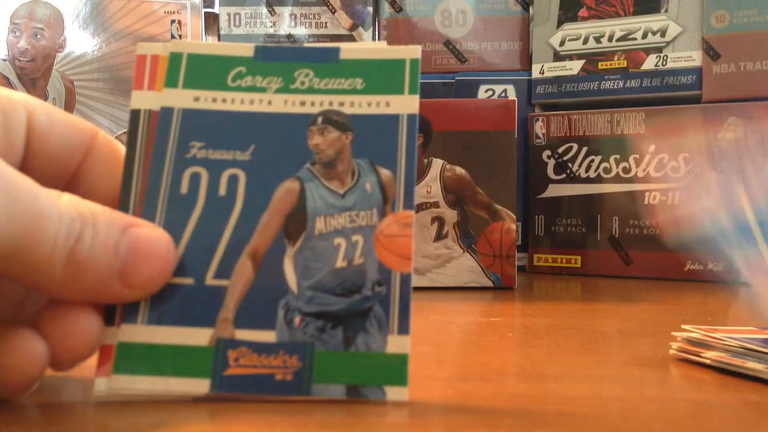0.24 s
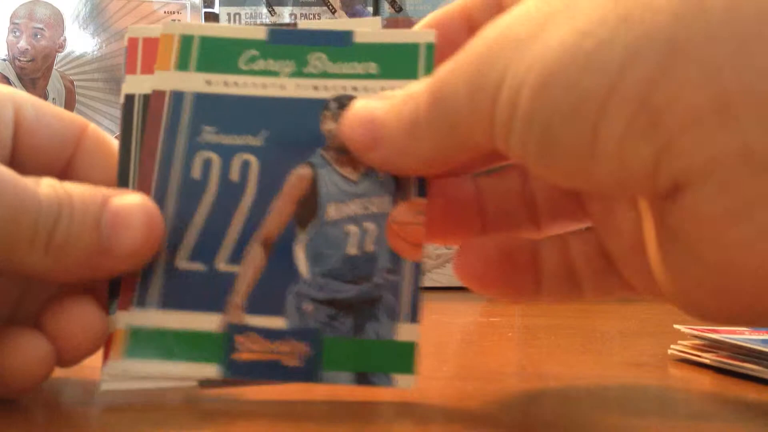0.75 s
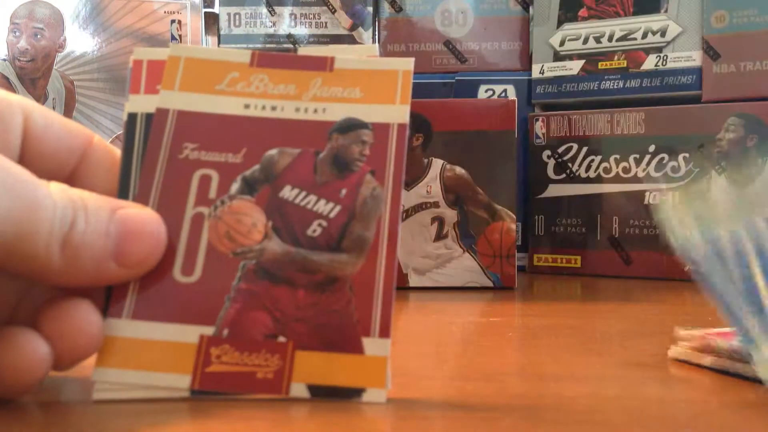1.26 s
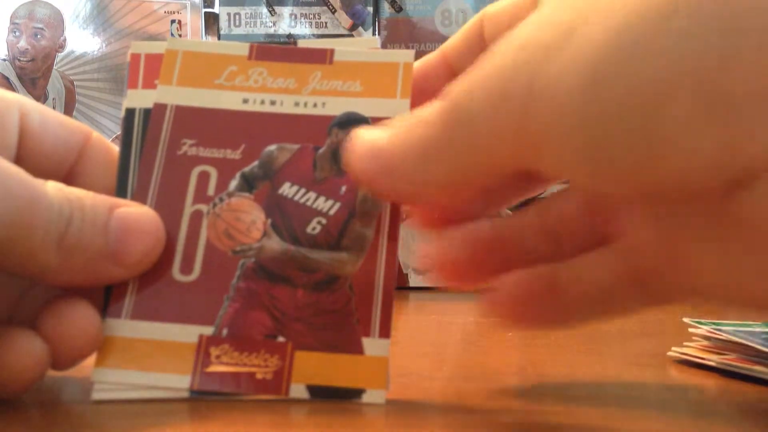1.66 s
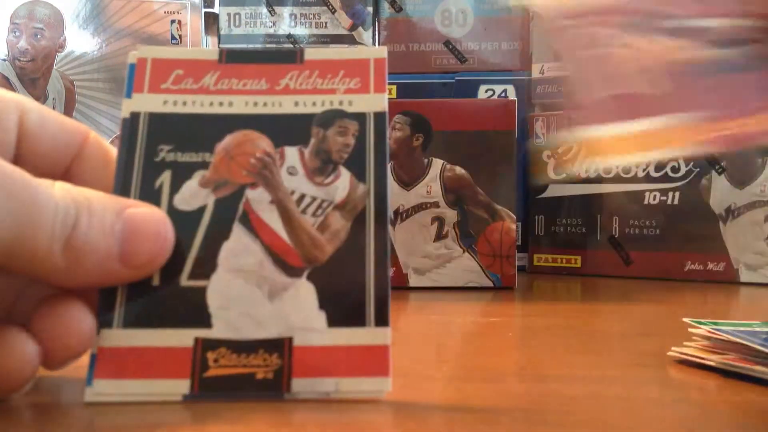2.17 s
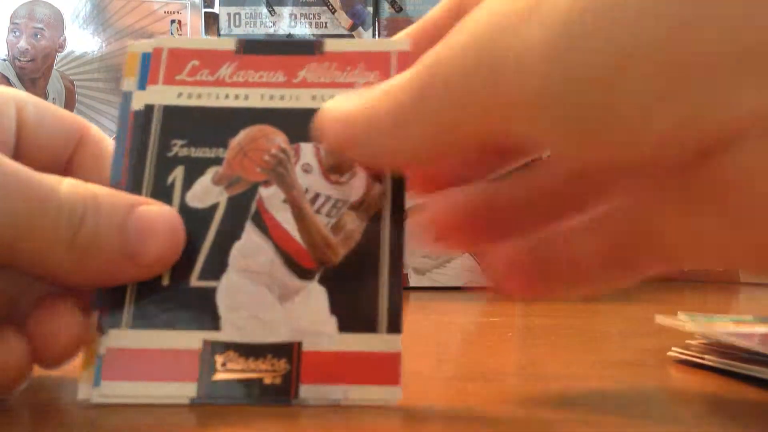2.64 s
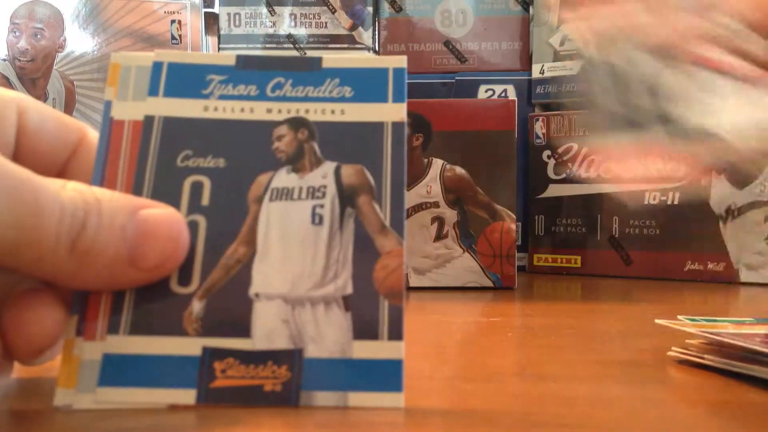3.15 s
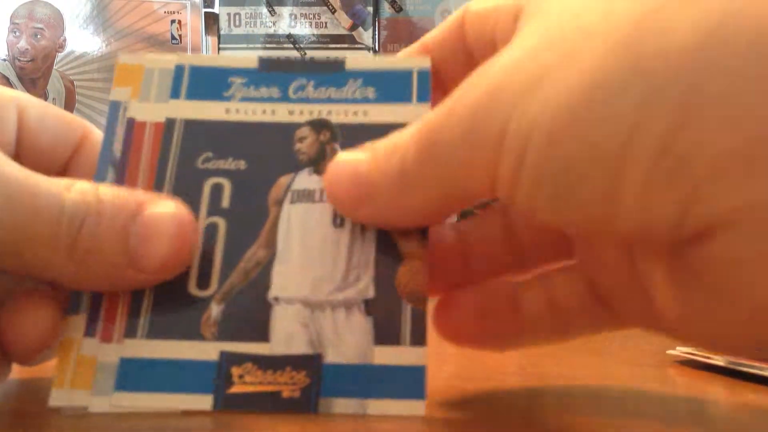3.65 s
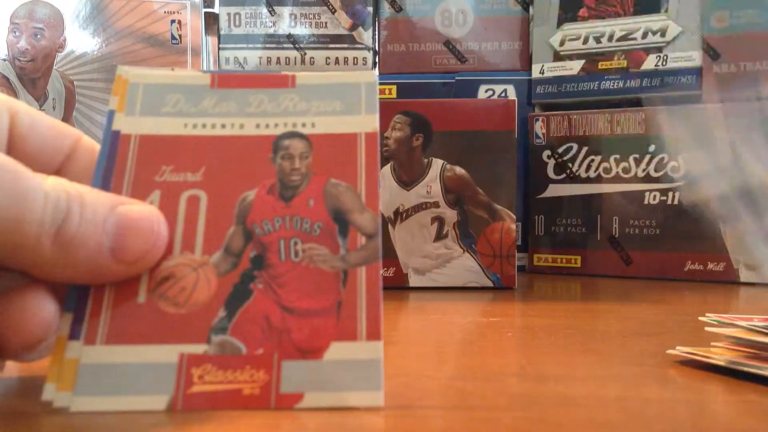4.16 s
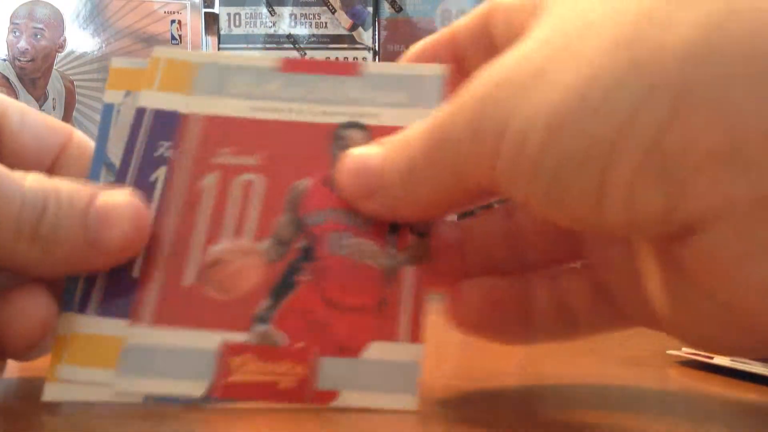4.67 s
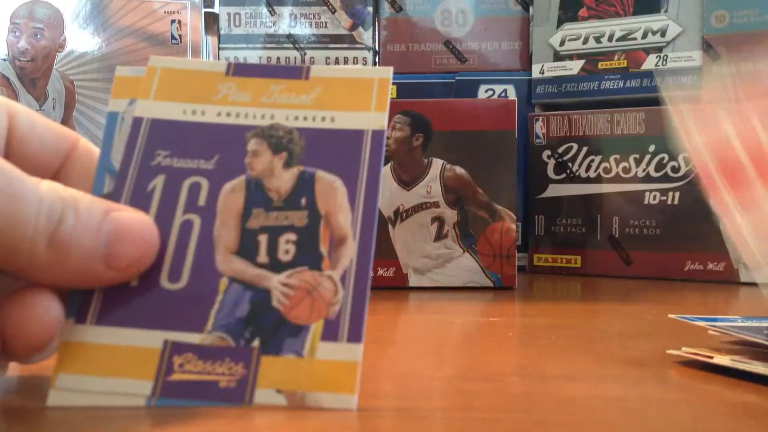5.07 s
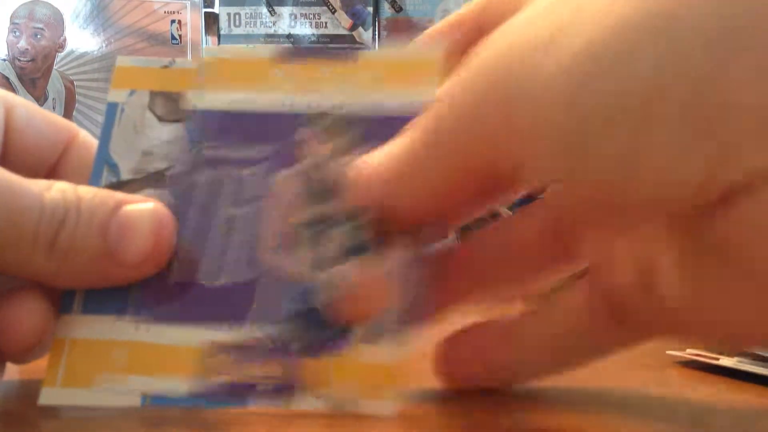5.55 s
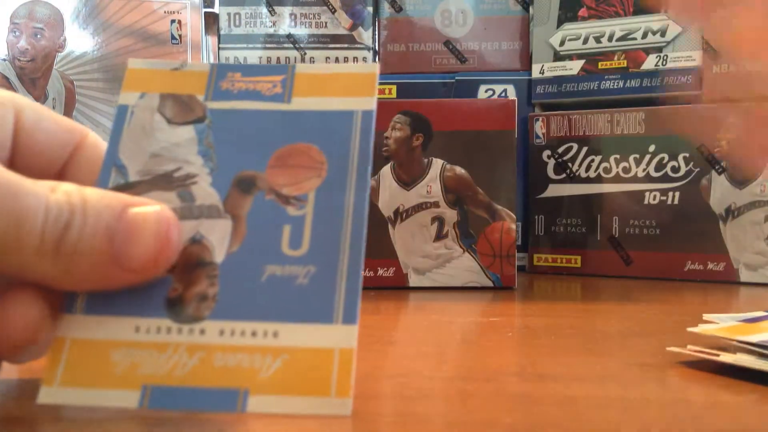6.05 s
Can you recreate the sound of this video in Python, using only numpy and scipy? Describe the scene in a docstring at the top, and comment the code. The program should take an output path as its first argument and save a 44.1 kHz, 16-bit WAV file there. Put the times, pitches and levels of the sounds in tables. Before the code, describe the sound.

In a quiet room, cards slide off a hand-held stack one by one, each snapping and slapping down with a dull desk bump.

```python
"""Soft swishes, snaps and slaps: trading cards are dealt onto a pile on a wooden desk, about one a second.
The thumb grips the top card of a hand-held stack, lets it creep, then pulls it free.
At the pile its edge taps down, it snaps off a fingertip, skids and slaps flat,
and the hand bumps the desk. A small quiet room answers."""
import sys
import numpy as np
from scipy import signal
from scipy.fft import rfft, irfft
from scipy.io import wavfile
from scipy.ndimage import uniform_filter1d

SR = 44100
rng = np.random.default_rng(int(sys.argv[2]) if len(sys.argv) > 2 else 0)


def bounce(signal):
    """Save signal as a 16-bit WAV file at the path given by the first command-line argument."""
    frames = np.transpose(np.atleast_2d(signal))
    limited = np.clip(frames, -1, 1)
    pcm = np.round(limited * 32767).astype(np.int16)
    wavfile.write(sys.argv[1], SR, pcm)


N = 278295
BLOW_SIZE = 8192  # samples in one short sound
AGE = np.arange(BLOW_SIZE) / SR

# the thumb draws a card off the stack: grip t/s, card free t/s, bump level/dB, creep/dB, pull/dB
CARD_DRAWS = [(0.722, 1.118, -61, -75, -55.5), (1.817, 2.156, -55.5, -76.5, -61),
              (2.785, 3.128, -42.5, -62.5, -51), (3.718, 4.036, -44.5, -62.5, -50),
              (4.636, 4.978, -49, -64.5, -49.5), (5.62, 5.707, -39.5, -55, -49.5)]
# the bent card springs off a fingertip: t/s, level/dB, brightness/(dB per octave), knock f/Hz
FINGER_SNAPS = [(1.3546, -23.5, -1.5, 3750), (2.393, -43, -3.5, 774), (3.3359, -19, -1.5, 2480),
                (4.2834, -25.5, -2, 2410), (5.221, -21, -2, 2460), (5.972, -39, -2.5, 2460)]


def undb(db):
    """Turn decibels into a factor to multiply by."""
    return 10 ** (np.asarray(db) / 20)


def unit(x):
    """Scale a sound to an average strength (rms) of 1."""
    return x / np.sqrt(np.mean(x ** 2))


def blow_level(x, db):
    """Scale a blow so that its energy, spread over 10 ms, has this level."""
    return x * undb(db) / np.sqrt(np.sum(x ** 2) / (.01 * SR))


def add(track, s, x):
    """Mix x into the track from time s."""
    start = int(s * SR)
    track[start:start + len(x)] += x[:N - start]


def read(points, hz):
    """Read between (f/Hz, value) points, with octaves evenly spaced."""
    at, value = np.transpose(points)
    return np.interp(np.log(hz + 1), np.log(at), value)


def colour(x, points, tilt_db=0):
    """Shape the tone by (f/Hz, gain/dB) points, made brighter by tilt_db per octave."""
    hz = np.fft.rfftfreq(BLOW_SIZE, 1 / SR)
    octaves = np.log2(np.maximum(hz, 250) / 2000)
    gain = undb(read(points, hz) + tilt_db * octaves)
    # build a filter that rings only after a hit, never before it
    cepstrum = irfft(np.log(gain))
    first_half = np.arange(BLOW_SIZE) < BLOW_SIZE // 2
    response = irfft(np.exp(rfft(2 * cepstrum * first_half) - cepstrum[0]))
    return signal.fftconvolve(x, response)[:len(x)]


def resonance(x, hz, width, db):
    """Lift one band, width Hz wide, or hollow it out if db is negative."""
    b, a = signal.iirpeak(hz, hz / width, fs=SR)
    return x + (undb(db) - 1) * signal.lfilter(b, a, x)


def drift(rate):
    """Wander smoothly through about `rate` random values a second."""
    hold = int(SR / rate)
    steps = np.repeat(rng.standard_normal(N // hold + 1), hold)
    return unit(uniform_filter1d(steps, hold)[:N])


def quiet_room(level_db=-63, waver_db=2.1, rumble_hz=700):
    """A low room rumble wavers under a faint even hiss."""
    # tone of the quiet room: f/Hz, gain/dB
    tone = [(15, -38.5), (25, -11), (75, -10), (154, -12), (172, -9.5), (224, -7), (404, -13), (501, -16),
            (749, -24), (1280, -23.5), (1500, -26), (2560, -29), (2780, -26.5), (3830, -27.5), (15000, -31)]
    noise = unit(colour(rng.standard_normal(N), tone))
    rumble = signal.sosfiltfilt(signal.butter(2, rumble_hz, fs=SR, output="sos"), noise)
    hiss = noise - rumble
    return undb(level_db) * (hiss + rumble * undb(waver_db * drift(9.6)))


def card_ring(x, stretch=1):
    """A touch is heard directly and through the card's bending notes; the grip stretches their pitch."""
    # notes of a held card: f/Hz, time to fade by 60 dB/s, level over the plain touch/dB
    notes = [(395.8, 0.046, 0), (841, 0.045, -6.5), (1460, 0.055, 0), (1692, 0.013, -7.5),
             (2074, 0.014, -5), (2510, 0.024, -3.5), (3190, 0.029, -5.5), (3600, 0.032, -20)]
    out = x
    for hz, t60, db in notes:
        width = np.log(1000) / (np.pi * t60)
        b, a = signal.iirpeak(hz * stretch, hz / width, fs=SR)
        out = out + undb(db) * signal.lfilter(b, a, x)
    return out


def blows(table, tone, chatter_db, chatter_s, chatter_hz, knock_db, knock_q, brush_db, brush_s):
    """The card brushes in, lands with a click and chatters; where it is hit favours one knock note."""
    out = np.zeros(N)
    landing = BLOW_SIZE // 4
    since = AGE - AGE[landing]
    brushing = undb(brush_db) * np.exp(-np.abs(since) / brush_s)
    settling = np.exp(-np.abs(since) / chatter_s)
    pressure = np.where(since < 0, brushing, settling)
    for s, db, tilt_db, knock_hz in table:
        chatter = rng.standard_normal(BLOW_SIZE) * pressure
        push = undb(chatter_db) * chatter / np.linalg.norm(chatter)
        push = signal.sosfilt(signal.butter(1, chatter_hz, "high", fs=SR, output="sos"), push)
        push[landing] -= 1  # the sharp click
        grip_stretch = 1 + 0.01 * np.tanh(rng.standard_normal())
        sound = card_ring(colour(push, tone, tilt_db), grip_stretch)
        sound = resonance(sound, knock_hz, knock_hz / knock_q, knock_db)
        add(out, s - AGE[landing], blow_level(sound, db))
    return out


def edge_taps():
    """A card's edge touches down on the pile with a dull tap."""
    # touchdowns: t/s, level/dB, brightness/(dB per octave), knock f/Hz
    touchdowns = [(0.3518, -31, -0.5, 403), (1.3268, -31.5, -2, 325), (2.3848, -42.5, 0, 310),
                  (3.312, -34.5, -1.5, 339), (4.258, -33.5, 0, 1840), (5.2005, -31.5, -0.5, 312),
                  (5.955, -32.5, -2, 484)]
    # tone of an edge: f/Hz, gain/dB
    tone = [(40, -6.5), (130, 5), (200, -5), (340, 5.5), (650, -8), (1120, -15.5), (1900, -6.5),
            (2700, -14.5), (3500, -15), (5500, -28.5), (8000, -33.5), (15000, -45)]
    return blows(touchdowns, tone, chatter_db=10, chatter_s=0.0036, chatter_hz=1131,
                 knock_db=5, knock_q=3.8, brush_db=-17.5, brush_s=0.0033)


def room_echo(x, wet_db, gap_s=0.00318, build_s=0.008):
    """Near walls return a dense short echo, whose highest notes die first."""
    # how long the room rings: f/Hz, time to fade by 60 dB/s
    fades = [(120, 0.28), (500, 0.24), (2500, 0.29), (5000, 0.27), (13000, 0.2)]
    # tone of the echo: f/Hz, gain/dB
    tone = [(50, -10.5), (200, 4), (400, 3), (800, -3.5), (1800, -6), (2450, -7.5), (3300, -3), (4600, -1),
            (7000, -5), (15000, -5.5)]
    age = np.arange(SR // 2) / SR
    hz = np.fft.rfftfreq(len(age), 1 / SR)
    noise = rfft(rng.standard_normal(len(age)))
    centres_hz = np.array(fades)[:, 0]
    tail = 0
    for share, (_, t60) in zip(np.eye(len(fades)), fades):
        band = read(np.column_stack([centres_hz, share]), hz)
        tail = tail + irfft(noise * band, len(age)) * np.exp(-np.log(1000) * age / t60)
    tail = tail * np.clip((age - gap_s) / build_s, 0, 1)
    tail = colour(tail / np.linalg.norm(tail), tone)
    return undb(wet_db) * signal.fftconvolve(x, tail)[:N]


def fibres(size, spread_db):
    """Paper fibres catch and let go: dense tiny clicks, a few much larger."""
    clicks = rng.standard_normal(size)
    strength = undb(spread_db * np.minimum(rng.exponential(size=size), 5))
    return unit(clicks * strength)


def skid(length, hz, sing_db=9, sing_q=8):
    """A short gritty swish of card on card sings at a note set by the bend."""
    # tone of the scrape: f/Hz, gain/dB
    tone = [(100, -10.5), (500, 2.5), (1100, -2), (2400, -0.5), (4500, -6.5), (8000, -15.5), (15000, -22.5)]
    pressure = np.sqrt(np.abs(np.sin(np.pi * np.minimum(AGE / length, 1))))
    grit = card_ring(colour(fibres(BLOW_SIZE, spread_db=3), tone))
    return pressure * unit(resonance(grit, hz, hz / sing_q, sing_db))


def skids(bend_s=0.016, bend_db=-19, bend_hz=2770):
    """The card scrapes softly as it bends before each snap, and skids over the pile."""
    # skids on the pile: t/s, length/s, level/dB, singing f/Hz
    pile_skids = [(0.375, 0.033, -41, 2450), (1.361, 0.02, -28, 1890), (2.392, 0.025, -46, 1620),
                  (3.348, 0.011, -33, 850), (4.288, 0.023, -29, 1780), (5.219, 0.041, -34.5, 2470),
                  (5.984, 0.016, -38, 2360)]
    out = np.zeros(N)
    for s, length, db, hz in pile_skids:
        add(out, s, undb(db) * skid(length, hz))
    for s, snap_db, *_ in FINGER_SNAPS:
        add(out, s - bend_s, undb(snap_db + bend_db) * skid(bend_s, bend_hz))
    return out


def slaps():
    """The card's face lands flat; a cushion of air under it rounds off the top of the click."""
    # landings: t/s, level before the cushion/dB, brightness/(dB per octave), knock f/Hz, top f/Hz
    landings = [(0.386, -34, 0.5, 2430, 9300), (1.372, -27, -0.5, 2030, 11000),
                (1.3814, -29.5, -2, 373, 9000), (2.4283, -43, -4, 554, 11000),
                (3.360, -34.5, -5, 830, 10000), (3.3642, -20, 2, 610, 9000), (4.300, -23.5, -2, 507, 14000),
                (5.249, -25, 0, 520, 19000), (5.9834, -23.5, 2.5, 5900, 15000)]
    # tone of a slap: f/Hz, gain/dB
    tone = [(40, 2), (150, -3.5), (280, 1.5), (600, 8.5), (1100, 1), (2400, -6), (3300, 1), (5500, -7),
            (7200, -8), (13000, -12.5), (16000, -15.5)]
    out = np.zeros(N)
    for *blow, top_hz in landings:
        hit = blows([blow], tone, chatter_db=2.5, chatter_s=0.0024, chatter_hz=1380,
                    knock_db=7, knock_q=7.1, brush_db=-12.5, brush_s=0.0012)
        cushion = signal.butter(3, top_hz, fs=SR)
        out += signal.lfilter(*cushion, hit + 1e-18)  # the tiny offset keeps the filter fast in silence
    return out


def desk_thuds(table):
    """A soft push rings the desk's low notes; a longer push is duller, and the spot sets the pitch."""
    # notes of the desk top: f/Hz, time to fade by 60 dB/s, relative level/dB
    notes = [(87, 0.07, -18.5), (134.4, 0.045, 4.5), (213.6, 0.069, -5), (251.5, 0.096, -5.5),
             (382, 0.061, -8), (495, 0.14, -9.5)]
    out = np.zeros(N)
    for s, db, push_s, pitch in table:
        ring = sum(undb(note_db - 60 * AGE / t60) * np.cos(2 * np.pi * hz * pitch * AGE)
                   for hz, t60, note_db in notes)
        push = np.sin(np.pi * np.minimum(AGE / push_s, 1))
        add(out, s, blow_level(signal.fftconvolve(ring, push)[:BLOW_SIZE], db))
    return out


def hand_bumps():
    """The hand meets the desk as it lays each card down."""
    # bumps: t/s, level/dB, push length/s, pitch factor
    bumps = [(0.402, -26.5, 0.0028, 1), (1.3828, -22, 0.0027, 1.05), (2.434, -27, 0.0033, 1.01),
             (3.371, -32.5, 0.0046, 1.37), (4.303, -24.5, 0.0027, 0.99), (5.259, -25.5, 0.0041, 1.07),
             (5.990, -30.5, 0.0031, 1.05)]
    return desk_thuds(bumps)


def grip_bumps(push_s=0.00796, pitch=0.835):
    """Each grip lands the thumb on the top card with a slow, dull low bump."""
    return desk_thuds([(grip, bump_db, push_s, pitch) for grip, _, bump_db, _, _ in CARD_DRAWS])


def draw_speed(creep_rise_s=0.057, pull_rise_s=0.0385, pull_hold_s=0.023, release_s=0.019):
    """A gripped card creeps evenly, speeds up into a short even pull, and falls silent once free."""
    t = np.arange(N) / SR
    speed = np.zeros(N)
    for grip, free, _, creep_db, pull_db in CARD_DRAWS:
        start = np.clip((t - grip) / creep_rise_s, 0, 1)
        pull = undb(pull_db) * np.exp(np.minimum(t - free + pull_hold_s, 0) / pull_rise_s)
        release = np.exp(-np.clip(t - free, 0, 1) / release_s)
        speed += start * np.maximum(undb(creep_db), pull) * release
    return speed


def slides(gain_db=-2.5, uneven_db=4, fast_db=-53):
    """Glossy card rubs on card: gritty while it creeps, a bright swish as it gathers speed."""
    speed = draw_speed()
    fast = np.clip(speed / undb(fast_db), 0, 1)
    drag = undb(uneven_db * drift(120))
    # tone of the rubbing: f/Hz, gain/dB
    tone = [(100, -16), (380, 2.5), (900, 0), (1400, -6), (1750, -8.5), (2300, -0.5), (3000, -7.5),
            (5500, -12.5), (7000, -16.5), (15000, -18.5)]
    grit = unit(fibres(N, spread_db=4.5) * drag)
    rub = resonance(card_ring(colour(grit, tone)), hz=1400, width=180, db=10)  # a bending note
    swish = resonance(rub, hz=4900, width=1700, db=7.4)
    return undb(gain_db) * speed * unit(rub + fast * (swish - rub))


def stack_taps():
    """Fingers and card corners tick on the held stack."""
    # ticks: t/s, level/dB, brightness/(dB per octave), knock f/Hz
    ticks = [(0.7245, -47, 2, 394), (0.773, -58, 2, 1440), (1.112, -47.5, -7, 830), (1.820, -57, -1, 910),
             (2.095, -40.5, 1, 1720), (2.174, -57, 7.5, 910), (2.717, -56, 5.5, 1280),
             (2.769, -44, -1.5, 623), (2.788, -53.5, 6, 1430), (3.014, -51.5, -4, 283),
             (3.091, -39, -1.5, 1390), (3.7235, -45, 3.5, 920), (3.974, -48, 1, 1330),
             (4.001, -45.5, 2.5, 1440), (4.612, -52, 0, 1460), (4.635, -54, -1, 1470),
             (4.8445, -40, 0.5, 1950), (4.944, -46.5, 0, 390), (5.624, -41.5, 2, 393),
             (5.736, -40.5, 2, 2340)]
    # tone of a tick: f/Hz, gain/dB
    tone = [(40, -0.5), (120, 13), (330, 7), (700, -0.5), (1150, -3.5), (1900, -14.5), (2500, -16.5),
            (3600, -25.5), (6500, -36), (15000, -46)]
    return blows(ticks + corner_catches(), tone, chatter_db=11.5, chatter_s=0.0047, chatter_hz=1070,
                 knock_db=10.5, knock_q=8.8, brush_db=-15, brush_s=0.008)


def corner_catches(per_draw=2, db=-62, spread_db=2, tilt_db=4, knock_hz=1460):
    """List faint ticks at chance moments of every draw, as the card's corners catch."""
    rows = []
    for grip, free, *_ in CARD_DRAWS:
        for _ in range(per_draw):
            rows.append((rng.uniform(grip, free), db + spread_db * rng.standard_normal(), tilt_db, knock_hz))
    return rows


def rustles():
    """Soft skin drags on the card's face and stirs only its low notes."""
    # fingertips shifting on the stack: t/s, length/s, level/dB
    shifts = [(0.842, 0.23, -59.5), (1.114, 0.18, -67), (2.897, 0.13, -71), (3.63, 0.11, -61.5)]
    # tone of the rustle: f/Hz, gain/dB
    tone = [(80, -15), (280, 0), (650, -8.5), (1400, -20), (6000, -32)]
    out = np.zeros(N)
    for s, length, db in shifts:
        pressure = np.sin(np.pi * np.minimum(AGE / length, 1))
        grit = unit(colour(fibres(BLOW_SIZE, spread_db=9), tone))
        add(out, s, undb(db) * pressure * grit)
    return out


def snaps():
    """The bent card springs off a fingertip with a sharp click."""
    # tone of a snap: f/Hz, gain/dB
    tone = [(40, -10), (150, -1), (300, -1), (650, -2), (880, 1), (1180, -10), (1700, -0.5), (2450, 4),
            (2900, -12), (3900, -1.5), (7000, -11), (15000, -25)]
    return blows(FINGER_SNAPS, tone, chatter_db=2.5, chatter_s=0.0038, chatter_hz=1504,
                 knock_db=7.5, knock_q=12, brush_db=-23.5, brush_s=0.0016)


def scene():
    """Stack, pile and desk are close to the microphone; each stirs the room from its own place."""
    card_clicks = edge_taps() + snaps()
    stack = stack_taps() + slides() + rustles()
    bent_card = card_clicks + skids()
    pile = slaps()
    desk = hand_bumps() + grip_bumps()
    walls = (room_echo(stack, wet_db=-11.5) + room_echo(bent_card, wet_db=-9.5)
             + room_echo(pile, wet_db=-13.5) + room_echo(desk, wet_db=-12.5))
    return (stack + bent_card + pile + desk + walls + quiet_room())[None]


def record(dry, bass_hz=45, top_hz=15350):
    """The small microphone hollows two bands, drops the deepest bass and cuts the top."""
    # hollows in the microphone's response: f/Hz, width/Hz, gain/dB
    dips = [(1145, 170, -3.5), (2835, 160, -0.5)]
    for hz, width, db in dips:
        dry = resonance(dry, hz, width, db)
    thinned = signal.sosfilt(signal.butter(2, bass_hz, "high", fs=SR, output="sos"), dry)
    return signal.sosfilt(signal.ellip(10, .2, 80, top_hz, fs=SR, output="sos"), thinned)


dry = scene()
out = record(dry)
bounce(out)
```